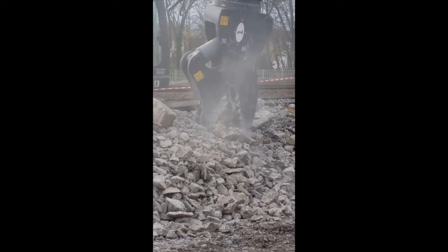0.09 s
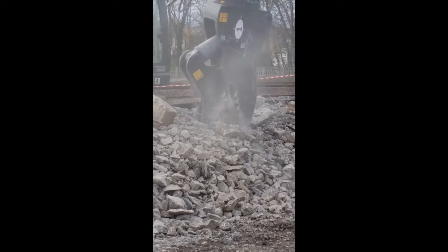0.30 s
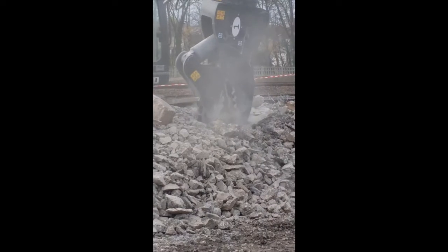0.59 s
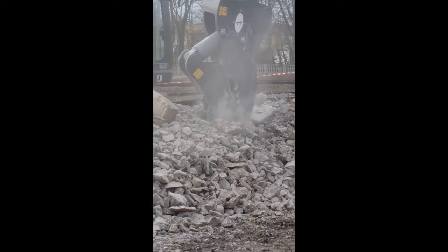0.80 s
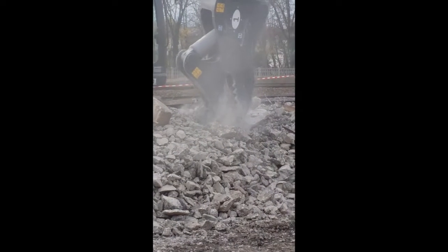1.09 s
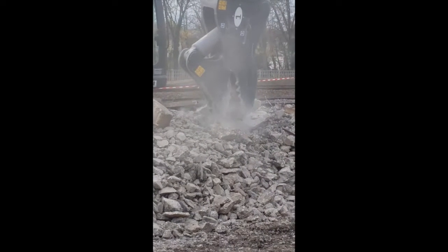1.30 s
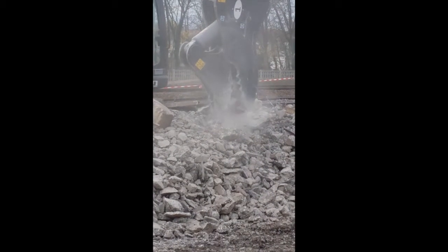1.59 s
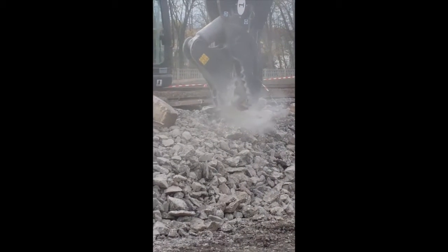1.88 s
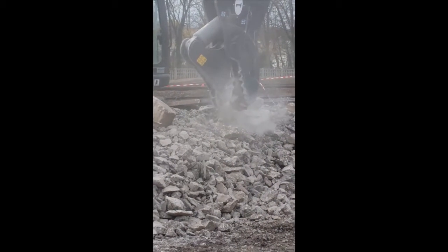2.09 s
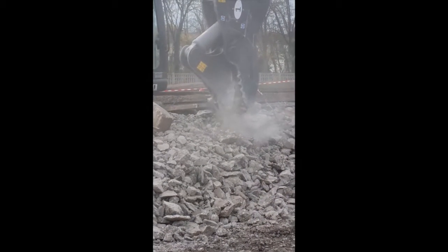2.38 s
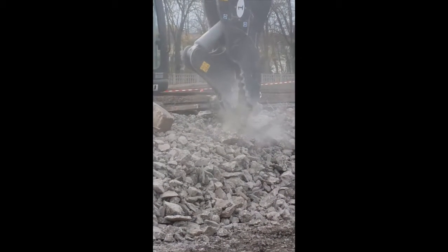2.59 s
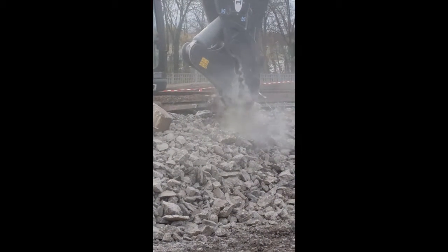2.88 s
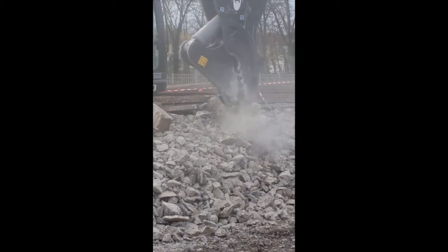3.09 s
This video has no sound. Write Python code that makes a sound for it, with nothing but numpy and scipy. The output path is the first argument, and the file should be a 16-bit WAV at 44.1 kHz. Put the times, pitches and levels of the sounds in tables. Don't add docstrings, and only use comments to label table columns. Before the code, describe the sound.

Hydraulic jaws crush concrete outdoors: dense cracks, thumps and steel clanks first, a near lull with a small squeak, then renewed crunching. Quiet engine hum behind, close stereo microphone, louder on the left.

```python
import sys
import numpy as np
from scipy import signal
from scipy.fft import rfft, irfft
from scipy.io import wavfile
from scipy.ndimage import uniform_filter1d

SR = 44100
rng = np.random.default_rng(int(sys.argv[2]) if len(sys.argv) > 2 else 0)


def wrap_up_sound(samples):
    columns = np.atleast_2d(samples).T
    tamed = np.clip(columns, -1, 1)
    steps = np.round(tamed * 32767).astype(np.int16)
    wavfile.write(sys.argv[1], SR, steps)


def magnitude_from_level(level_db):
    exponent = np.asarray(level_db, float) / 20
    return 10 ** exponent


N = 141120


def evened(x):
    return x / np.sqrt(np.mean(x ** 2) + 1e-20)


def wobble(seconds):
    size = max(int(seconds * SR), 2)
    smooth = uniform_filter1d(rng.standard_normal(N), size)
    return evened(uniform_filter1d(smooth, size))


def tone(hz):
    return 2 * np.pi * np.cumsum(hz) / SR


def read(points, hz):
    f, value = np.transpose(points)
    return np.interp(np.log(hz + 1), np.log(f + 1), value)


def colour(x, points):
    return irfft(rfft(x) * magnitude_from_level(read(points, np.fft.rfftfreq(N, 1 / SR))), N)


def coloured_noise(noise, points):
    click = np.eye(1, N, N // 2)[0]
    return colour(noise, points) / np.linalg.norm(colour(click, points))


def resonate(x, hz, width):
    r = np.exp(-np.pi * width / SR)
    pole = r * np.exp(2j * np.pi * hz / SR)
    return 2 * np.sqrt(1 - r) * signal.lfilter([1], [1, -pole], x).real


def ring(drive, modes):
    wander_hz, wander_db, wander_s = 11, 4, 0.018
    steady_t60_s = 0.15
    out = np.zeros(N)
    for hz, db, t60 in modes:
        r = magnitude_from_level(-120 / (t60 * SR))
        stored = signal.lfilter([1 - r], [1, -r], drive ** 2)
        level = np.sqrt(2 * stored) * magnitude_from_level(db + wander_db * wobble(wander_s))
        pitch = hz + wander_hz * min(1, steady_t60_s / t60) * wobble(wander_s / 2)
        out = out + level * np.cos(2 * np.pi * rng.random() + tone(pitch))
    return out


def excavator():
    # pitch in Hz, level in dB rms, pitch wander in Hz.
    hum_tones = [(31, -64.5, 1.8), (70.5, -62.5, 3.55), (143.7, -56, 10.95), (198.5, -56.5, 1.8),
                 (638, -65.5, 3.2)]
    # frequency in Hz, wash level in dB per Hz.
    wash_colour = [(12, -63), (20, -37), (79, 3), (96, -15.5), (198, -10), (347, -24), (642, -17),
                   (949, -31), (16000, -41)]
    hum = np.zeros((2, N))
    for port in range(2):
        for hz, db, wander_hz in hum_tones:
            level = magnitude_from_level(db + 2.0 + 1.8 * wobble(0.058))
            hum[port] += level * np.cos(tone(hz + wander_hz * wobble(0.0324)))
    wash = colour(rng.standard_normal((2, N)), wash_colour)
    wash = wash / np.std(signal.lfilter([1, -1], [1, -.965], wash))
    flutter_db = 0.7 * wobble(0.04)
    return hum + magnitude_from_level(-60.5 + flutter_db) * wash


def yard(x):
    t60_s, scatter_db, first_return_s = 0.18, -13, 0.012
    t = np.arange(SR // 2) / SR
    tail = rng.standard_normal((2, len(t))) * magnitude_from_level(-60 * t / t60_s) * (t > first_return_s)
    return magnitude_from_level(scatter_db) * signal.fftconvolve(x, tail / np.linalg.norm(tail[0]), axes=1)[:, :N]


def squeaks():
    # time in seconds, pitch in Hz, level in dB.
    groan = [
        (2.21, 1130, -80),
        (2.228, 1140, -55),
        (2.28, 1210, -61),
        (2.34, 1280, -59),
        (2.38, 1290, -75),
    ]
    # start in seconds, pitch in Hz, level in dB, decay in seconds.
    pings = [
        (1.88, 4370, -61, .015),
        (2.226, 4350, -62, .01),
        (2.268, 4450, -59, .005),
        (2.29, 4320, -60, .012),
        (2.04, 490, -49, .015),
        (2.005, 1460, -65, .015),
        (1.242, 3450, -54, .008),
    ]
    t = np.arange(N) / SR
    s, hz, db = np.transpose(groan)
    level = magnitude_from_level(np.interp(t, s, db, -120, -120) + 5.5 * wobble(0.008))
    out = level * np.sin(tone(np.interp(t, s, hz) + 60 * wobble(0.00403)))
    for start, pitch_hz, level_db, decay in pings:
        u = np.maximum(t - start, 0) / decay
        swell = 3 * u ** 0.5 * np.exp(-u)
        out = out + magnitude_from_level(level_db) * swell * np.sin(tone(pitch_hz * (1 + 0.019 * wobble(0.00315))))
    return out


def blows(rows, db):
    t, out = np.arange(N) / SR, np.zeros(N)
    for (s, hz, level_db, rise), turn in zip(rows, rng.random(len(rows))):
        u = np.maximum((t - s) / rise + 1, 0)
        out = out + magnitude_from_level(level_db + db) * u * np.exp(1 - u) * np.cos(2 * np.pi * (hz * t + turn))
    return out


def jolts():
    # loudest moment in seconds, pitch in Hz, level in dB, rise in seconds.
    boom_blows = [(.218, 95.7, -42.5, .01), (.305, 150, -41, 0.0095), (.417, 215, -35, 0.0076),
                  (.586, 129, -35, 0.0065), (.669, 118, -34, 0.0066), (.73, 117.4, -34, 0.013),
                  (.865, 238.5, -36.5, 0.0065), (.93, 107.8, -34.5, 0.016), (1.051, 138, -35, 0.021),
                  (1.869, 125.5, -52, 0.012), (2.673, 141, -36.5, 0.019), (2.875, 272.8, -42, 0.01),
                  (2.876, 129, -42.5, 0.0061)]
    return blows(boom_blows, 4.5)


def clanks():
    # loudest moment in seconds, pitch in Hz, level in dB, rise in seconds.
    jaw_blows = [(.202, 1166, -44.5, 0.0049), (.238, 638, -42.5, 0.0092), (.347, 516, -34.5, 0.0034),
                 (.366, 674, -31.5, 0.0063), (.415, 484, -31, 0.0055), (.415, 1290, -42, 0.0039),
                 (.456, 632, -34.5, 0.0095), (.598, 656, -37, 0.0072), (.711, 1067, -34.5, 0.003),
                 (2.855, 1121, -34, 0.0055), (.755, 1010, -39.5, .005), (.827, 762, -37.5, 0.0051),
                 (.861, 506, -37, 0.006), (.922, 1400, -41.5, 0.0045), (.926, 1765, -36, 0.0026),
                 (.93, 643, -35.5, 0.0069), (.956, 651, -36, 0.0078), (.991, 644, -38, 0.011),
                 (1.048, 480, -32.5, 0.0046), (1.18, 603.7, -28, 0.0034), (1.263, 970, -38.5, 0.0028),
                 (1.28, 651, -37.5, 0.021), (2.062, 580, -53, 0.0097), (2.421, 1610, -41.5, .004),
                 (2.422, 592, -37.5, 0.0044), (2.424, 1162, -35, 0.0044), (2.448, 1203, -34.5, 0.0036),
                 (2.466, 1574, -40.5, .004), (2.482, 545, -39, 0.0051), (2.489, 1130, -35.5, 0.0021),
                 (2.54, 1550, -55, 0.012), (2.64, 1150, -48, .005), (2.683, 1144, -32, 0.0032),
                 (2.683, 958, -35, 0.0027), (2.701, 602, -30, 0.0071), (2.701, 1593, -40, 0.0069),
                 (2.708, 1152, -35, 0.002), (2.856, 1291, -34, 0.003), (2.853, 1808, -40, 0.0026),
                 (2.868, 642.7, -32, 0.0075), (2.863, 469.5, -32.5, 0.0044), (2.722, 570, -36, 0.0046),
                 (.553, 641, -37, 0.0053), (.336, 331.5, -36.5, .004)]
    return blows(jaw_blows, 2.5)


def grains():
    per_second, spread_db, clump_db = 3000, 3.2, 1.5
    size = magnitude_from_level(spread_db * np.minimum(rng.exponential(1, N), 5))
    size = size * (rng.random(N) < per_second / SR)
    smooth_power = abs(uniform_filter1d(size ** 2, 70))
    return evened(np.sqrt(smooth_power + 0.052) * magnitude_from_level(clump_db * wobble(0.015)))


def grinding():
    # time in seconds, grinding level in dB, thump share in dB, grit share in dB.
    pressure = [(0, -52, 10.5, -13.5), (.29, -48.5, 7.5, -12.5), (.45, -41, 10, -14),
                (.68, -43, -14, -11.5), (.95, -37.5, -0.5, -14), (1.22, -41.5, -2, -13), (1.38, -50, 0, -7),
                (1.5, -57, 6.5, -9), (1.7, -68, -8, -22), (1.95, -61.5, 3.5, -14), (2.3, -52.5, -1.5, -7.5),
                (2.57, -42, 3.5, -12.5), (2.8, -53.5, -3, -8), (2.97, -54.5, 8.5, -3.5), (3.2, -66, 0, -1)]
    t = np.arange(N) / SR
    at, *levels_db = np.transpose(pressure)
    load, low, high = (magnitude_from_level(np.interp(t, at, db)) ** 2 for db in levels_db)
    return load, load * low, load * high


def crunches():
    # start in seconds, length in seconds, level in dB, thump in dB, grit in dB.
    slow_breaks = [
        (2.393, 0.15, -35, -2.5, -15),
        (2.653, 0.092, -30.5, -9, -12),
        (2.725, 0.075, -42, 3.5, -8.5),
        (0.32, 0.12, -35.5, -14, -21),
        (0.626, 0.072, -40.5, -12, -26),
    ]
    t = np.arange(N) / SR
    power = np.zeros((3, N))
    for start, length, db, thump_db, grit_db in slow_breaks:
        swell = np.sin(np.pi * np.clip((t - start) / length, 0, 1) ** 0.77) ** 2
        for part, share_db in enumerate((0, thump_db, grit_db)):
            power[part] += magnitude_from_level(db + share_db) ** 2 * swell
    return power


def bursts(times, db, rise_s, fall_s):
    tail_db, tail_s = -13.5, 0.043
    t, train = np.arange(SR // 2) / SR, np.zeros(N)
    train[np.round(np.asarray(times) * SR).astype(int)] = magnitude_from_level(db) ** 2
    fall = np.exp(-2 * t / fall_s) + magnitude_from_level(tail_db) ** 2 * np.exp(-2 * t / tail_s)
    shape = (1 - np.exp(-t / rise_s)) ** 2 * fall
    return np.maximum(signal.oaconvolve(train, shape / shape.max())[:N], 0)


def fractures():
    # time in seconds, peak in dB, thump in dB, grit in dB.
    cracks = [(0.203, -28, -16, -42), (0.332, -27, 2.5, -22), (0.364, -27.5, 5, -20),
              (0.406, -20, -2.5, -21), (0.523, -31, 4, -20.5), (0.548, -31.5, 7, -35),
              (0.592, -40, -10, -16), (0.624, -32.5, 7, -24), (0.706, -27.5, 6, -13),
              (0.725, -26.5, -19, -18), (0.749, -23.5, 0.5, -18), (0.817, -31.5, 3.5, -36),
              (0.853, -25, 3, -20), (0.918, -27.5, -1, -23), (1.039, -23, -2.5, -22),
              (1.116, -28.5, -18, -24), (1.174, -24.5, 1.5, -28), (1.26, -25.5, -5.5, -22),
              (1.342, -29, -2, -25), (1.868, -38, -29, -12), (2.041, -46.5, 10.5, -40),
              (2.229, -44.5, -4.5, -10.5), (2.325, -39.5, -10, -15), (2.637, -35.5, 3, -13),
              (2.694, -29.5, -19, -9.5), (2.854, -20, -7.5, -37)]
    s, db, thump_db, grit_db = np.transpose(cracks)
    db = db - 3.5
    return (bursts(s, db, rise_s=0.00062, fall_s=0.017),
            bursts(s, db + thump_db, rise_s=0.0093, fall_s=0.0078),
            bursts(s, db + grit_db + 1.5, rise_s=0.0013, fall_s=0.021))


def chips():
    # time in seconds, peak in dB, knock in dB.
    snaps = [(0.0486, -50, -19), (0.1967, -41.5, -10), (0.3117, -45.5, -16), (0.3284, -37.5, -11),
             (0.703, -42.5, 11), (0.7495, -35.5, 7.5), (0.9135, -37.5, 9), (1.0315, -41, 12.5),
             (1.1654, -43, 12), (1.2575, -45.5, 14), (1.8675, -53.5, -11), (2.149, -58.5, 2),
             (2.3905, -51, 5), (2.4165, -53.5, 12), (2.7764, -44.5, -6), (2.8497, -28.5, 3.5)]
    s, db, knock_db = np.transpose(snaps)
    rise_s, fall_s = 0.0004, 0.0097
    return bursts(s, db - 1.5, rise_s, fall_s), bursts(s, db + knock_db - 10, rise_s, fall_s)


def boom(drive):
    # pitch in Hz, level in dB, time to die by 60 dB in seconds.
    arm_modes = [(77.96, -11, 0.13), (102.73, -4, 0.045), (143.64, 1, 0.1), (192, -6.5, 0.02),
                 (235.7, -12, 0.017)]
    return 0.43 * ring(drive, arm_modes)


def steel_jaws(drive):
    # pitch in Hz, level in dB, time to die by 60 dB in seconds.
    jaw_modes = [(329.5, -6, 0.058), (466.2, -6.5, 0.213), (514.7, -6.5, 0.11), (562, -4, 0.158),
                 (647, -3, 0.258), (704, -15.5, 0.073), (772, -11.5, 0.12), (1125, -11, 0.024),
                 (1205, -12.5, 0.041), (1330, -21.5, 0.167), (1587, -19.5, 0.038), (1773, -21, 0.247),
                 (2143, -18, 0.062)]
    return 0.29 * ring(drive, jaw_modes)


def rubble(drive):
    # frequency in Hz, level in dB per Hz.
    stone_colour = [(120, -25), (200, -5), (418, -4), (650, 1), (903, -8.5), (1500, -13), (3000, -26),
                    (3900, -34), (6600, -120)]
    return magnitude_from_level(-4) * coloured_noise(drive * rng.standard_normal(N), stone_colour)


def grit(drive):
    # frequency in Hz, level in dB per Hz.
    grit_colour = [(1180, 1), (2000, -1.5), (2810, -6.5), (6940, -9.5), (7910, -20), (8700, -18),
                   (14500, -29), (15500, -21), (16000, -58)]
    # pitch in Hz, width in Hz, level in dB.
    grit_ring = [(4480, 260, -19)]
    dust = drive * rng.standard_normal(N)
    ringing = sum(magnitude_from_level(db) * resonate(dust, hz, width) for hz, width, db in grit_ring)
    return coloured_noise(dust, grit_colour) + ringing


def knocks(drive):
    # pitch in Hz, width in Hz, level in dB.
    knock_bands = [(1150, 120, -4.5), (1580, 160, -2.5), (2200, 67, -5.5)]
    return sum(magnitude_from_level(db) * resonate(drive * rng.standard_normal(N), hz, width) for hz, width, db in knock_bands)


def crusher():
    texture = grains()
    fine, coarse = texture ** 0.56, texture ** 2
    crack, crack_thump, crack_grit = fractures()
    load, load_thump, load_grit = grinding()
    swell, swell_thump, swell_grit = crunches()
    snap, chip_knock = chips()
    scrape = magnitude_from_level(-3) ** 2 * swell_grit
    middle = np.sqrt(fine * crack + coarse * (load + swell))
    thump = np.sqrt(fine * (crack_thump + load_thump + swell_thump))
    knock = np.sqrt(fine * chip_knock + coarse * scrape)
    spray = np.sqrt(fine * (crack_grit + snap) + coarse * (load_grit + swell_grit))
    pair = [steel_jaws(middle) + rubble(middle) + boom(thump) + grit(spray) + squeaks() + knocks(knock)
            for _ in range(2)]
    return np.array(pair) + clanks() + jolts()


def scene():
    # frequency in Hz, left level above right in dB.
    lean_points = [(60, 8), (130, 11.5), (290, 10.5), (640, 10.5), (1150, 20), (2300, 3), (6820, 0),
                   (15000, -2)]
    # frequency in Hz, phase between the ports in radians.
    lead_points = [(65, .35), (350, .05), (700, .35), (1100, 3.15), (1450, 5.2), (1700, 3.5), (2800, 3.4),
                   (4500, 4.3)]
    # frequency in Hz, likeness of the ports from 0 to 1.
    same_points = [(30, .5), (60, .99), (560, .98), (1050, .9), (1300, .6), (2800, .58), (5000, .45),
                   (9000, .2)]
    jaws = crusher()
    a, b = rfft(jaws + yard(jaws) + excavator())
    hz = np.fft.rfftfreq(N, 1 / SR)
    same = np.clip(read(same_points, hz), 0, 1)
    lean = magnitude_from_level(-read(lean_points, hz))
    shared = same * a + np.sqrt(1 - same ** 2) * b
    right = lean * np.exp(-1j * read(lead_points, hz)) * shared
    return irfft(np.array([a, right]) * 2 / (1 + lean), N)


def top_cut(x):
    return signal.sosfilt(signal.butter(12, 16460, fs=SR, output="sos"), x)


def record(dry):
    # frequency in Hz, gain in dB.
    mix_colour = [(6800, 0.5), (7600, 2.5), (7900, -3), (8200, 4.5), (9000, 2.5), (15300, 5), (15550, 9),
                  (15800, -69)]
    hiss = colour(rng.standard_normal((2, N)), [(2000, -16), (6000, -6), (16000, -16)])
    power = abs(uniform_filter1d((dry ** 2).mean(0), SR // 10))
    loudness_db = 10 * np.log10(power + 1e-9)
    hiss = hiss * magnitude_from_level(0.15 * (loudness_db - loudness_db.mean()))
    return top_cut(colour(dry + magnitude_from_level(-72) * hiss, mix_colour))


dry = scene()
out = record(dry)
wrap_up_sound(out)
```